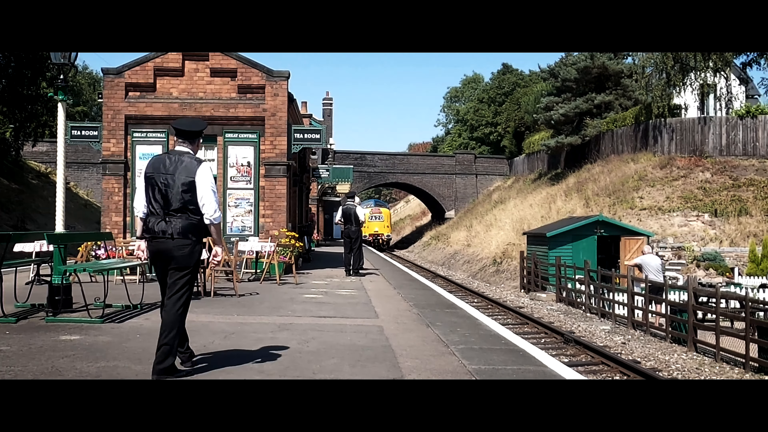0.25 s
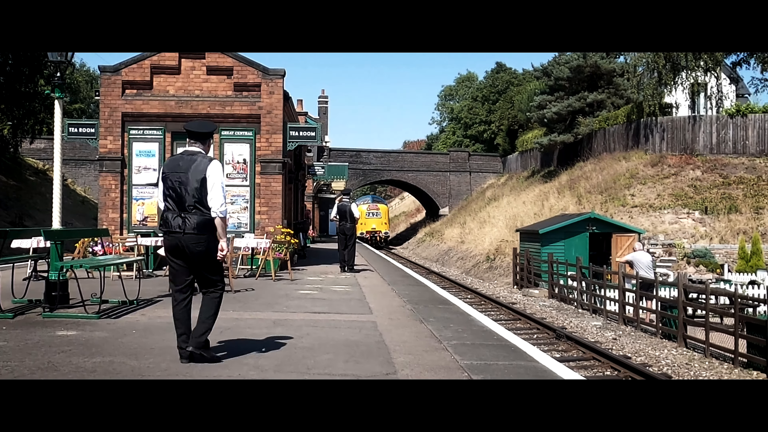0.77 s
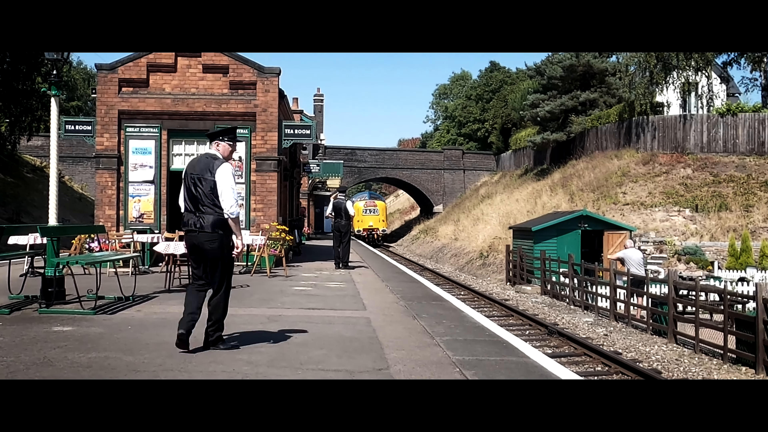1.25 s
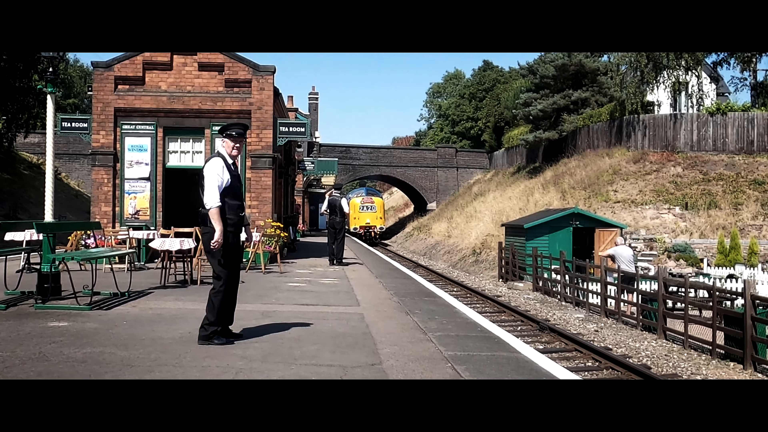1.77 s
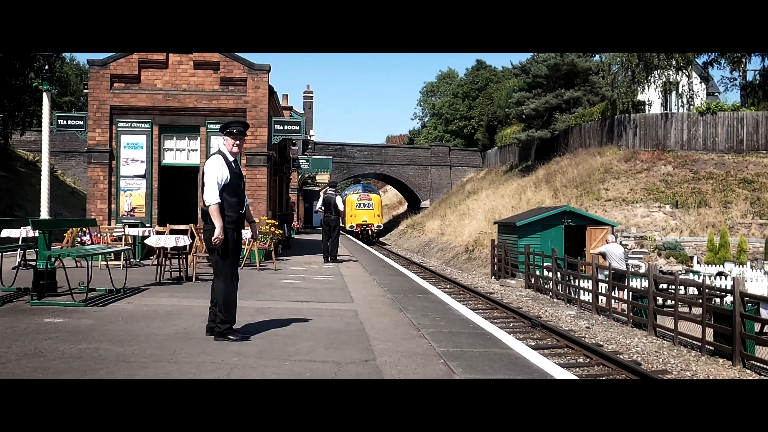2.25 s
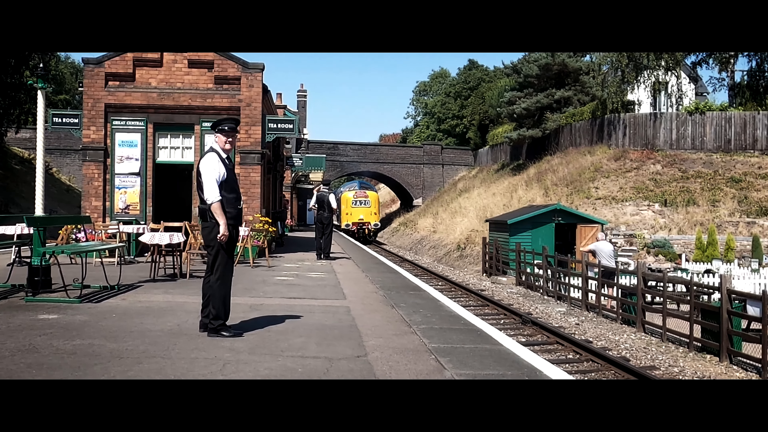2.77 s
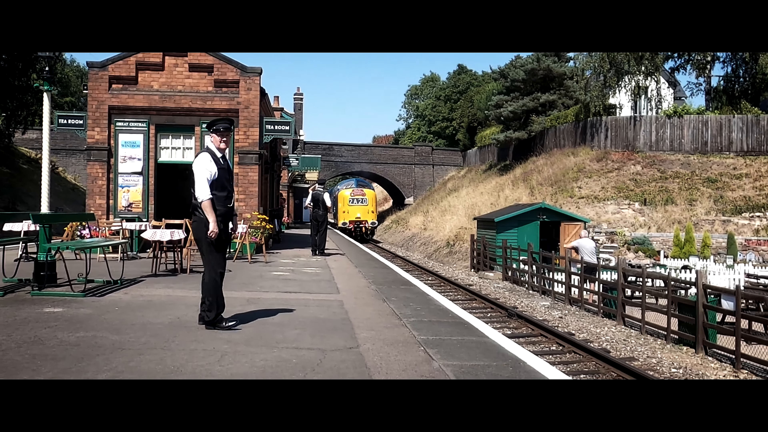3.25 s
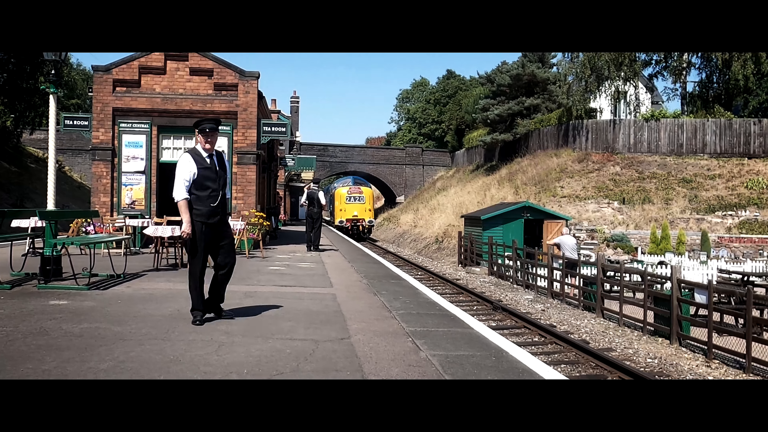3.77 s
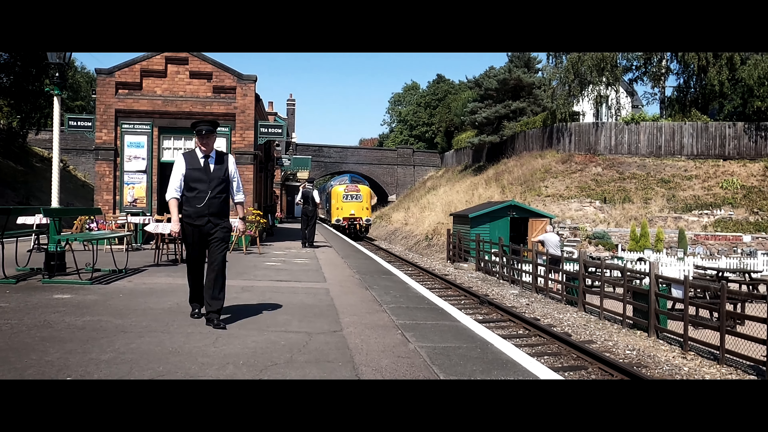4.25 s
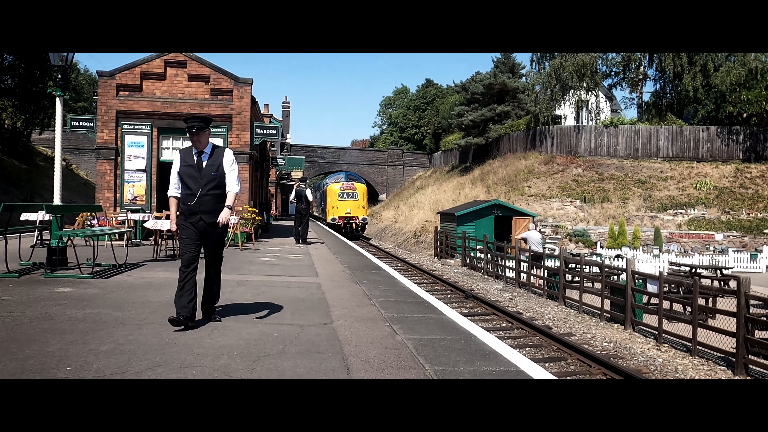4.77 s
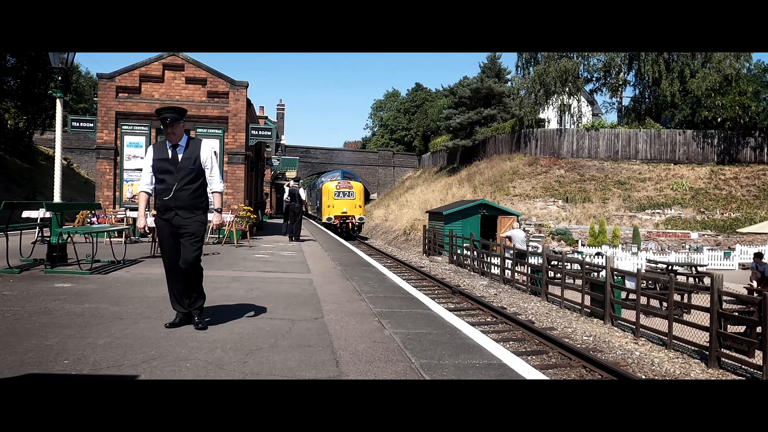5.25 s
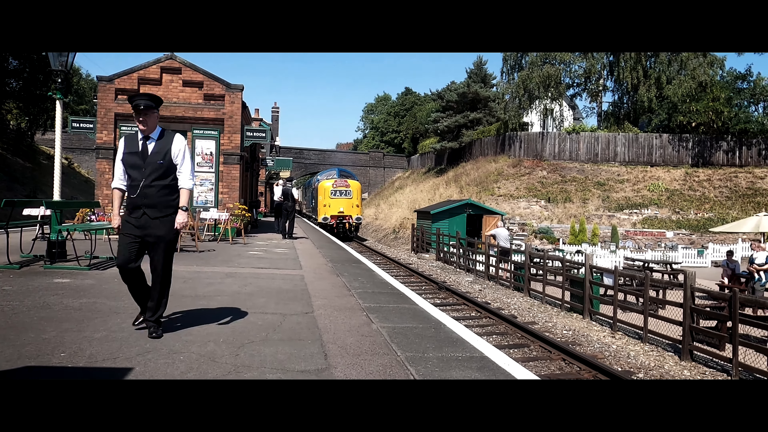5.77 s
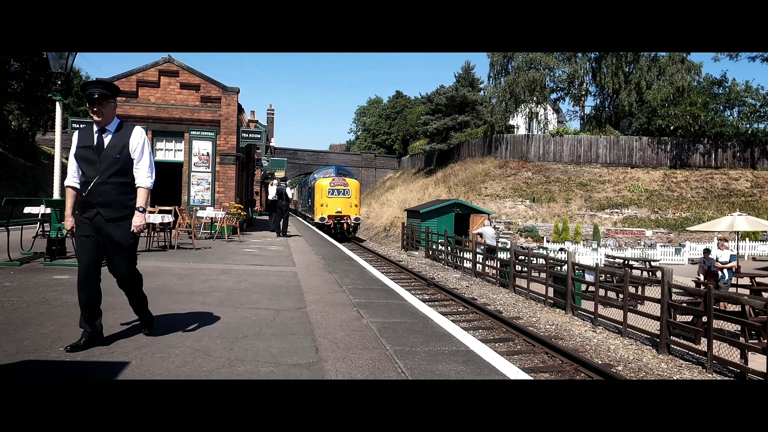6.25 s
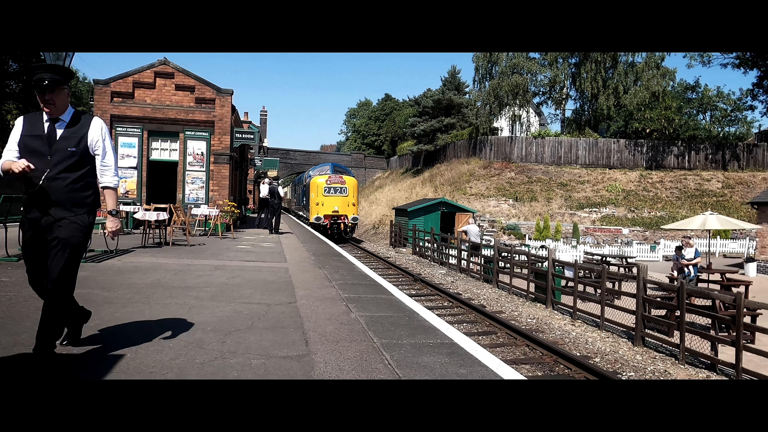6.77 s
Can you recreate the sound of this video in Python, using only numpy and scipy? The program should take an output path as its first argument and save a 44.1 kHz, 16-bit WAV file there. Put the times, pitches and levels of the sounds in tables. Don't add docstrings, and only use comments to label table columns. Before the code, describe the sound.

Heavy throbbing diesel drone and airy roar fill an outdoor station while shoe heels knock and grit ticks close by on the right.

```python
import sys
import numpy as np
from scipy import signal
from scipy.fft import rfft, irfft, next_fast_len
from scipy.io import wavfile
from scipy.ndimage import uniform_filter1d

SR = 44100
rng = np.random.default_rng(int(sys.argv[2]) if len(sys.argv) > 2 else 0)


def put_to_file(sound):
    columns = np.atleast_2d(sound).T
    safe = np.clip(columns, -1, 1)
    whole_steps = np.round(safe * 32767)
    wavfile.write(sys.argv[1], SR, whole_steps.astype(np.int16))


def boost(x):
    u = np.asarray(x, float) / 20
    return 10 ** u


N = 309624
FIRINGS = 9

# time in seconds, exhaust swell in dB, fan swell in dB.
LOAD = [(0.0, -10, -.5), (.6, -11.5, 0.5), (1.3, -5, -.5), (1.9, -1, 1), (2.6, 0, 3), (3.0, 1, 1.5),
        (3.7, -3, -1), (4.25, -3.5, -2), (4.65, 6, -1), (5.2, -0.5, 1), (5.85, 0.5, 0.5), (6.5, -2, -2.5),
        (7.02, 1, -0.5)]


def curve(table):
    s, *columns = np.transpose(table)
    return [np.interp(np.arange(N) / SR, s, c) for c in columns]


def over_hz(table, hz):
    f, value = np.transpose(table)
    return np.interp(np.log(hz + 1), np.log(f + 1), value)


def walk(rate):
    k = int(SR / rate)
    held = np.repeat(rng.standard_normal(N // k + 1), k)
    return 1.242 * uniform_filter1d(uniform_filter1d(held, k), k)[:N]


def from_middle():
    return (np.arange(N) - N / 2) / SR


def low_swell():
    exhaust_db = curve(LOAD)[0]
    deep_db = 3.5 * walk(4) - 0.67 * from_middle()

    def swell(hz):
        share = np.clip((hz - 60) / 70, 0, 1)
        return share * exhaust_db + (1 - share) * deep_db
    return swell


def firing_notes():
    # time in seconds, firing rate of the front engine in Hz, of the rear engine in Hz.
    firing_rate = [(0.0, 109.56, 106.76), (0.4, 109.57, 106.65), (0.9, 108.86, 106.29),
                   (1.3, 109.24, 106.16), (1.7, 109.7, 106.77), (2.0, 110.59, 106.03),
                   (2.3, 108.97, 106.48), (2.7, 110.05, 105.86), (3.1, 110.37, 108.0),
                   (3.5, 109.71, 106.56), (4.0, 109.52, 107.23), (4.4, 109.16, 105.51),
                   (4.7, 110.64, 106.48), (5.0, 108.47, 106.69), (5.4, 109.26, 105.94),
                   (5.9, 109.03, 106.49), (6.4, 109.17, 105.58), (7.02, 109.54, 107.65)]
    # time in seconds, note of the front engine in dB, of the rear engine in dB.
    firing_level = [(0.0, -16, -45.5), (0.4, -14, -30), (0.9, -12.5, -24.5), (1.3, -17, -21.0),
                    (1.7, -24.5, -15.0), (2.0, -25.5, -22.5), (2.3, -19.5, -24), (2.7, -16.0, -31.5),
                    (3.1, -15, -17), (3.5, -10.5, -24.5), (4.0, -12.0, -21.5), (4.4, -15, -31),
                    (4.7, -21.5, -19.5), (5.0, -8.5, -12), (5.4, -11.5, -24), (5.9, -9.5, -19.5),
                    (6.4, -7.0, -37), (7.02, -8.0, -24.5)]
    out = np.zeros(N)
    for hz, db in zip(curve(firing_rate), curve(firing_level)):
        turn = 2 * np.pi * np.cumsum(hz) / SR / FIRINGS
        out += boost(db) * np.cos(FIRINGS * turn)
    return out


def crankshafts():
    shaft_hz = 12.15, 11.83
    return [2 * np.pi * np.cumsum(hz * (1 + 0.001502 * walk(0.99))) / SR for hz in shaft_hz]


def front_throb(turn):
    # time in seconds, level in dB.
    throb_level = [(0.0, -36.5), (.7, -26), (1.4, -35), (1.9, -25.5), (2.9, -41.5), (3.4, -42),
                   (3.7, -31.5), (4.6, -22), (5.5, -28.5), (6.4, -38.5), (7.02, -26.5)]
    return boost(curve(throb_level)[0] + 2.0 * walk(5)) * np.cos((FIRINGS - FIRINGS // 3) * turn)


def blower(turn):
    # time in seconds, level in dB.
    blower_level = [(0.0, -37.5), (.72, -26.5), (1.5, -29), (2.3, -17), (3.05, -16), (3.7, -22),
                    (4.3, -17.5), (4.9, -23), (5.3, -19.5), (6.0, -17), (7.02, -19.5)]
    # time in seconds, depth in dB, half length in seconds.
    fades = [(0.881, 14.5, .08), (1.696, 12.5, 0.091), (3.206, 14.5, .05), (3.363, 10.5, 0.12),
             (5.144, 15.5, .07), (6.119, 7.5, 0.098), (6.632, 5, .07)]
    t = np.arange(N) / SR
    fade_db = sum(db * np.clip(1 - np.abs(t - s) / half, 0, 1) for s, db, half in fades)
    return boost(curve(blower_level)[0] - fade_db) * np.cos((2 * FIRINGS + 1) * turn)


def strong_orders(turn):
    # shaft order, level half-way in dB, growth in dB per second.
    strong = [(8, -29.5, 0.2), (10, -27.5, 0), (15, -32.5, 1.07), (16, -33, 1.97), (17, -34, 0.7),
              (21, -37, 0.7), (27, -48.5, 2), (28, -48, 2)]
    out = np.zeros(N)
    for order, db, growth in strong:
        level_db = db + growth * from_middle() + 2.5 * walk(4)
        drift = 0.46 * walk(1.5) + 2 * np.pi * rng.random()
        out += boost(level_db) * np.cos(round(order) * turn + drift)
    return out


def weak_orders(turns):
    # shaft order, front engine in dB, rear engine in dB.
    weak = [(2, -46.5, -38), (3, -33, -43.5), (4, -42.5, -42), (4.93, -42.5, -47), (7, -34.5, -38),
            (11, -38.5, -46.5), (12, -42.5, -46.5), (13, -36, -39.5), (14, -41.5, -42.5), (18, -39, -41.5),
            (20, -41.5, -36.5), (22, -40.5, -49.5), (23, -50, -45.5), (24, -47.5, -53.5), (26, -60, -56),
            (34, -47.5, -49.5), (37, -50, -51.5), (40, -51.5, -59), (42, -47, -56.5), (46, -48.5, -54.5)]
    swell = low_swell()
    out = np.zeros(N)
    for order, *levels in weak:
        near_db = 0.61 * swell(12 * order)
        for db, turn in zip(levels, turns):
            level_db = db + near_db + 3.5 * walk(3.016)
            drift = 1.3 * walk(1.497) + 2 * np.pi * rng.random()
            out += boost(level_db) * np.cos(round(order) * turn + drift)
    return out


def engines(turns):
    front = turns[0]
    notes = firing_notes() + front_throb(front) + blower(front) + strong_orders(front) + weak_orders(turns)
    return np.sqrt(2) * notes


def bands(shape, lo_hz, hi_hz, level_db, flicker_db):
    # frequency in Hz, side minus mid in dB.
    side_level = [(25, -15.5), (100, -22.5), (300, -16.5), (600, -13), (1200, -21.5), (2500, -19),
                  (5000, -1.5), (9000, 6.5), (14000, -4)]
    size = next_fast_len(N)
    f = np.arange(size // 2 + 1) * SR / size
    noise = rfft(rng.standard_normal((2, size))) * boost(over_hz(shape, f))
    noise[1] *= boost(over_hz(side_level, f))
    out = 0
    for hz in lo_hz * 2 ** np.arange(0, np.log2(hi_hz / lo_hz), 1 / 3):
        window = np.cos(np.pi / 2 * np.clip(3 * np.log2(f / hz + 1e-9), -1, 1)) ** 2
        band = irfft(noise * window, size)[:, :N]
        out = out + band * boost(level_db(hz) + flicker_db * walk(9))
    return out


def rumble():
    # frequency in Hz, level in dB per Hz.
    rumble_colour = [(15, -4.5), (30, -1), (55, 5.5), (90, -0.5), (130, -12.5), (155, -14.5), (200, 5.5),
                     (260, -10.5), (300, -20), (400, -41)]
    return boost(-11) * bands(rumble_colour, 31, 400, low_swell(), flicker_db=2.0)


def roar(firing_phase):
    # frequency in Hz, level in dB per Hz.
    roar_colour = [(200, -35), (300, -6.5), (400, 0.5), (560, -3), (620, -5.5), (1020, -2.5), (1300, -6),
                   (1900, -10.5), (3100, -18), (4600, -26.5), (6200, -35.5), (8000, -46), (10000, -52.5),
                   (12500, -58.5), (15500, -63)]
    exhaust_db, fans_db = curve(LOAD)
    roar_db = 0.4 * (exhaust_db + 3) + 0.3 * fans_db - 0.5 * from_middle()
    hiss_db = fans_db + 0.18 * from_middle()
    swell = np.array([roar_db, fans_db, hiss_db])

    def level_db(hz):
        octave_steps = np.log2(hz / 550) / 1.55
        share = np.clip(1 - np.abs(octave_steps - np.arange(len(swell))), 0, 1) + 1e-9
        share[0] += hz < 550
        share[-1] += hz > 4700
        return share @ swell / share.sum() * min(7000 / hz, 1)

    noise = bands(roar_colour, 250, 16000, level_db, flicker_db=.8)
    return boost(-17) * noise * (1 + .04 * np.cos(firing_phase))


def ring(x, hz, width):
    return signal.lfilter(*signal.iirpeak(min(hz, .45 * SR), max(hz / width, .3), SR), x)


def strike(t60, rise):
    t = np.arange(SR // 4) / SR
    decay = boost(-60 * t / max(t60, .003))
    return rng.standard_normal(len(t)) * (1 - np.exp(-t / rise)) * decay


def add(out, at, sound, db, pan_db):
    sound = sound[:N - at] * boost(db) / np.abs(signal.hilbert(sound)).max()
    out[:, at:at + len(sound)] += sound * boost(np.array([[pan_db], [-pan_db]]) / 2)


def footfalls():
    # time in seconds, peak in dB, decay by 60 dB in seconds.
    heels = [(5.159, -25.5, 0.06), (6.055, -12, 0.13), (6.078, -21, .15), (6.106, -21.5, 0.28),
             (6.457, -18.5, 0.4)]
    # frequency in Hz, width in Hz, level in dB.
    sole = [(189, 100, 5), (410, 230, -4), (593, 400, -7.5), (980, 250, -4), (1565, 130, -2),
            (2240, 400, -12), (3400, 1600, -24.5)]
    # time in seconds, peak in dB.
    pebble = [
        (0.3317, -19.5),
        (0.3337, -27),
    ]
    # frequency in Hz, width in Hz, level in dB.
    stone = [(1600, 340, -7.5), (2980, 800, -8.5), (5040, 800, -1), (6100, 700, 0), (7820, 1400, -9.5)]
    # time in seconds, peak in dB.
    grit = [(0.3027, -55), (1.1077, -61), (1.1805, -48), (1.258, -44.5), (1.3274, -55.5), (1.384, -49.5),
            (1.4358, -51), (2.185, -59.5), (2.2195, -42), (4.284, -49), (4.3076, -44), (5.1257, -55),
            (5.503, -36.5), (5.5955, -42.5), (6.1622, -46.5), (6.1697, -41), (6.5273, -60.5), (6.771, -49),
            (6.782, -48)]
    # time in seconds, peak in dB, centre in Hz, decay by 60 dB in seconds,
    # width as a share of the centre.
    scuffs = [(0.9, -58.5, 8970, .15, 0.44), (1.226, -55.5, 9700, .13, .09), (1.31, -57.5, 10000, .15, .4),
              (1.695, -53.5, 7500, .15, 0.55), (2.225, -50.5, 8000, .1, 0.82), (2.81, -58, 10400, .15, .2),
              (3.165, -53.5, 6700, .17, 0.33), (4.965, -54.5, 8900, .3, 0.46),
              (5.506, -39.5, 7500, .09, .6), (5.525, -44, 12120, 0.073, 0.22),
              (6.115, -49.5, 5980, 0.091, .36), (6.163, -43.5, 6000, 0.053, .5),
              (6.774, -48, 6130, .04, .2), (6.9, -53, 7400, 0.49, 0.55)]
    out = np.zeros((2, N))

    def play(s, db, t60, rise, body, pan_db):
        burst = strike(t60, rise)
        sound = sum(boost(g) * ring(ring(burst, hz, width), hz, width) for hz, width, g in body)
        add(out, int(s * SR), sound, db, pan_db)

    for s, db, t60 in heels:
        play(s, db - 2.0, t60, 0.0022, sole, -4.0)
    for s, db in pebble:
        play(s, db, .006, 0.00049, stone, -6.5)
    for s, db in grit:
        play(s, db + 2.5, .013, 0.00046, [(9500, 6000, 0)], -11.5)
    for s, db, hz, t60, share in scuffs:
        play(s, db + 2.5, t60, 0.011, [(hz, share * hz, 0)], -11)
    return out


def microphone(pair):
    # frequency in Hz, left minus right in dB.
    port_tilt = [(60, -1.5), (200, -1.3), (1000, -1.8), (2500, -1.6), (5000, -3.5), (9000, -6), (14000, -4)]
    # frequency in Hz, radians the left port leads.
    port_lead = [(0, 0.27), (600, -0.22), (860, 0.69), (1290, -1.2), (1550, -0.58), (2070, -0.92),
                 (2580, -1.2), (2840, -1.04)]
    size = next_fast_len(N)
    f = np.arange(size // 2 + 1) * SR / size
    tilt_db = over_hz(port_tilt, f) / 2
    lead = np.exp(1j * over_hz(port_lead, f))
    ports = np.array([boost(tilt_db) * lead, boost(-tilt_db)])
    return irfft(rfft(pair, size) * ports, size)[:, :N]


def scene():
    turns = crankshafts()
    notes = engines(turns)
    mid, side = rumble() + roar(FIRINGS * turns[0])
    pair = np.array([notes + mid + side, notes + mid - side])
    return microphone(pair) + footfalls()


def low_pass(x):
    return signal.sosfilt(signal.butter(12, 15500, fs=SR, output="sos"), x)


def record(dry):
    knee = .9
    over = np.maximum(np.abs(dry) - knee, 0)
    rounded = dry - np.sign(dry) * (over - (1 - knee) * np.tanh(over / (1 - knee)))
    return low_pass(rounded)


dry = scene()
out = record(dry)
put_to_file(out)
```